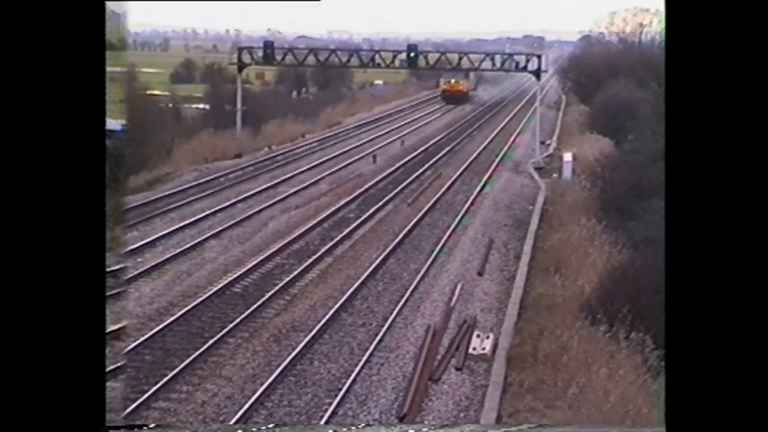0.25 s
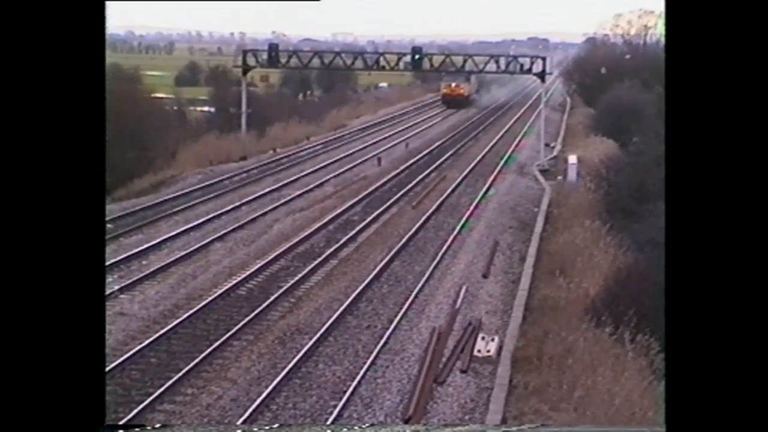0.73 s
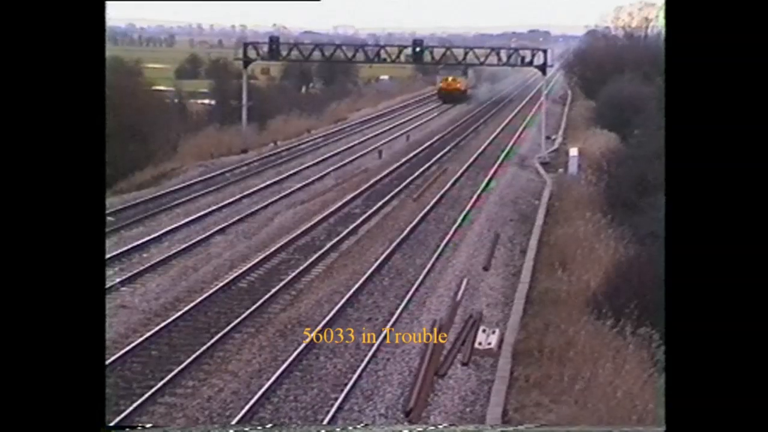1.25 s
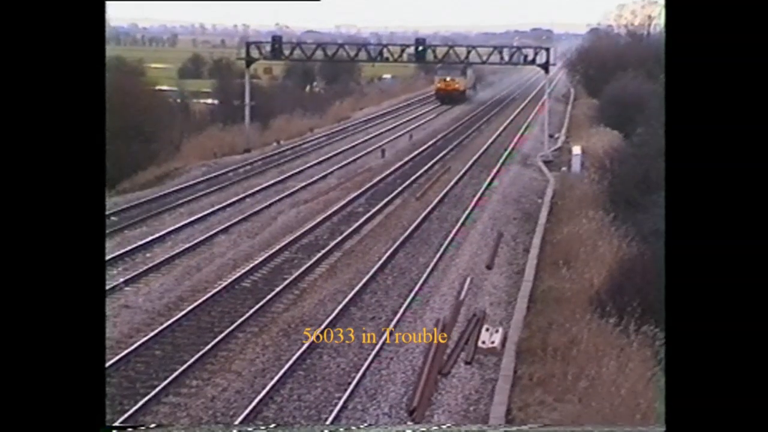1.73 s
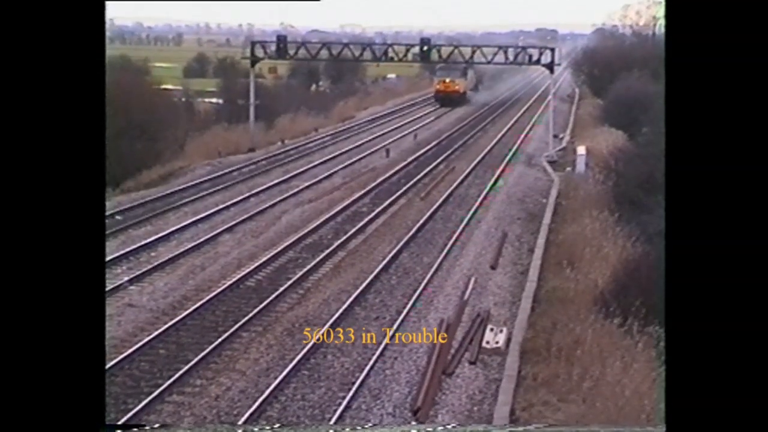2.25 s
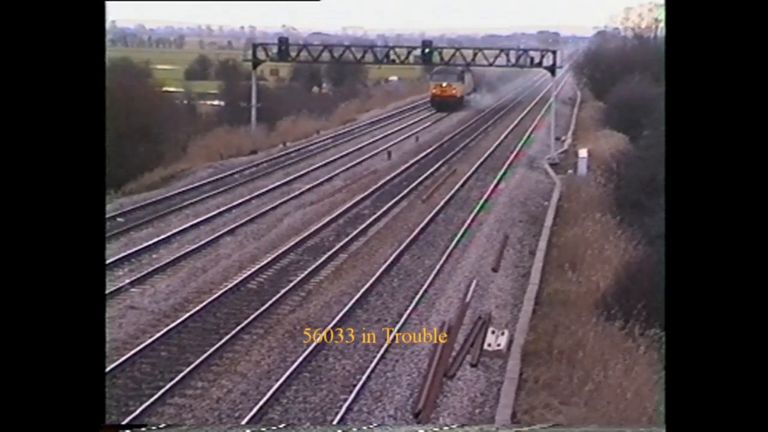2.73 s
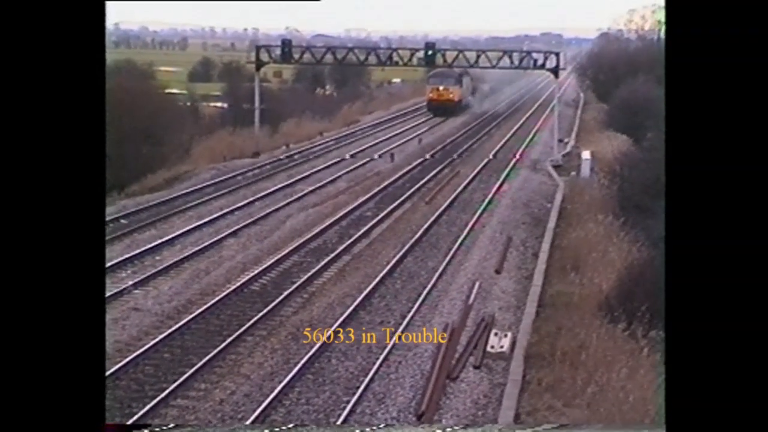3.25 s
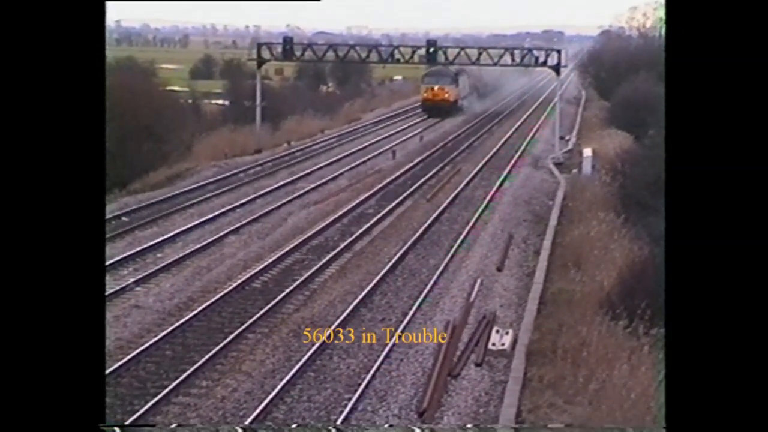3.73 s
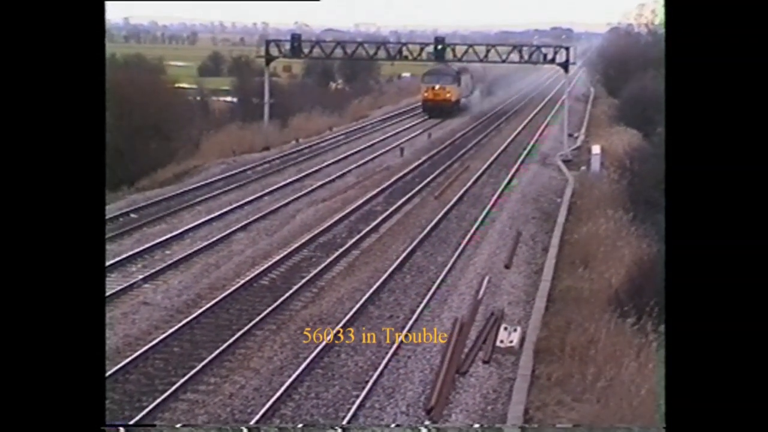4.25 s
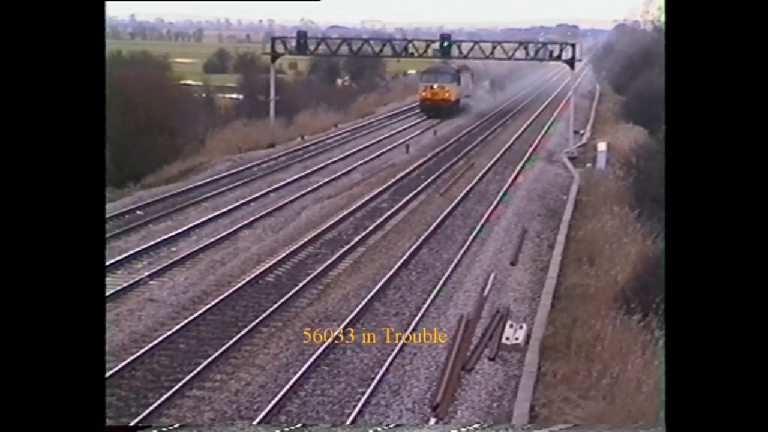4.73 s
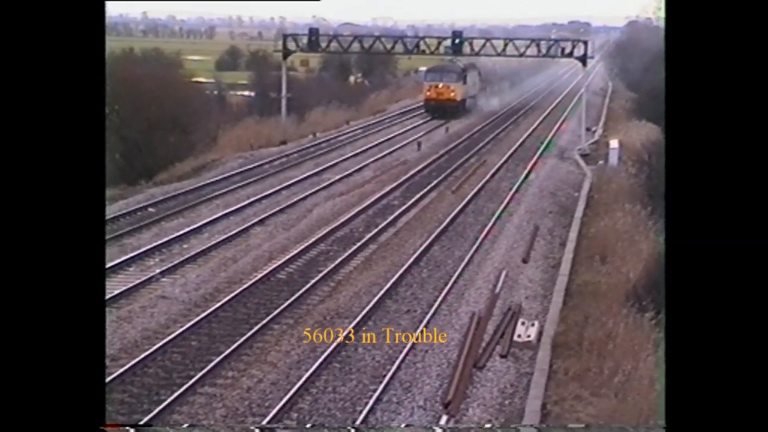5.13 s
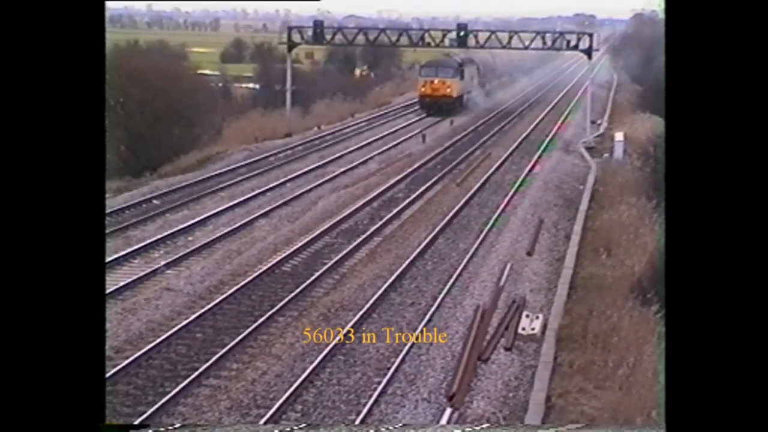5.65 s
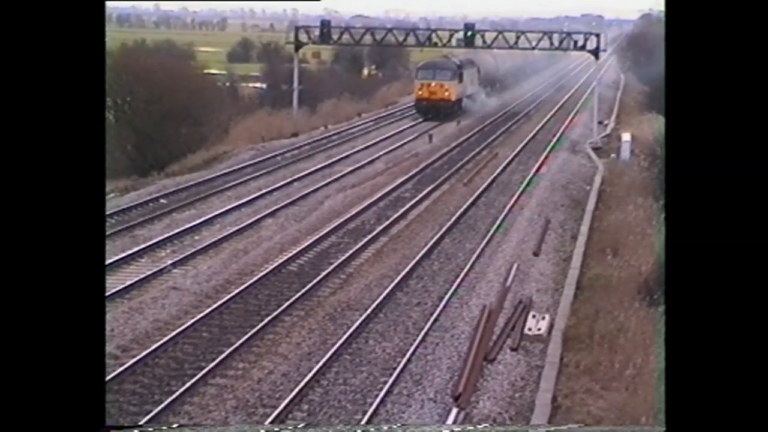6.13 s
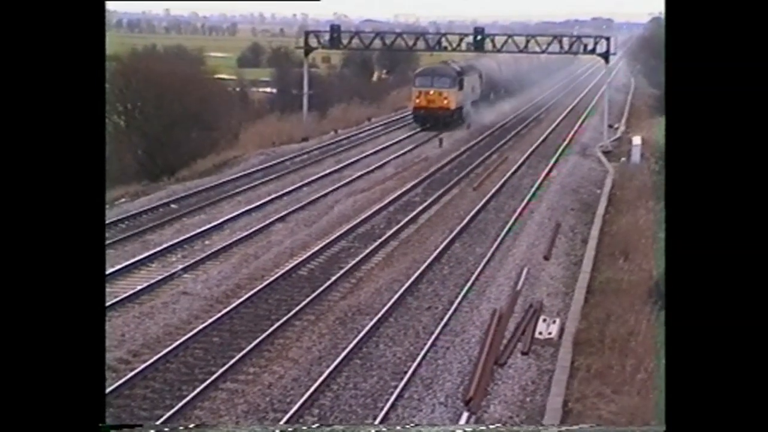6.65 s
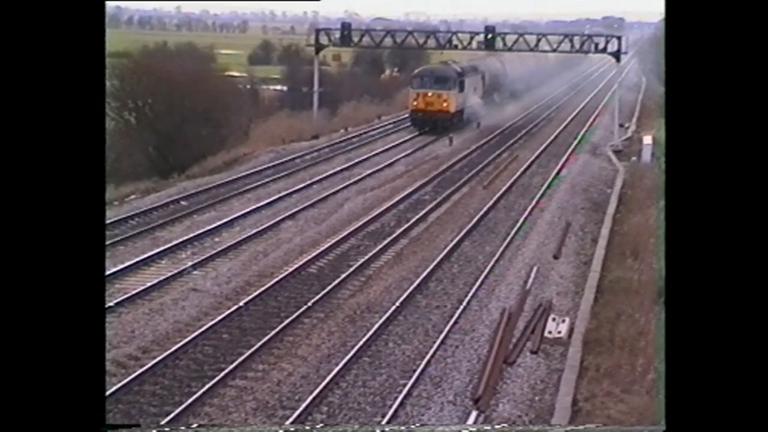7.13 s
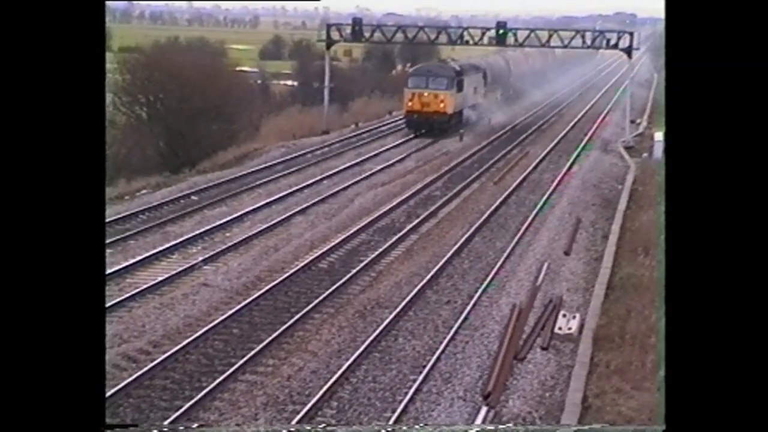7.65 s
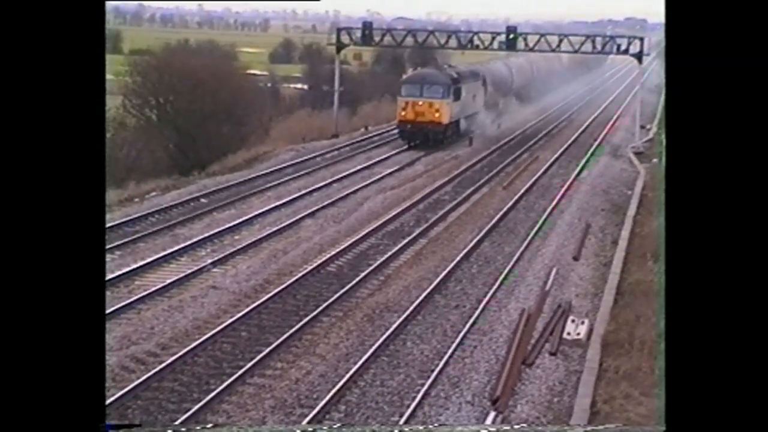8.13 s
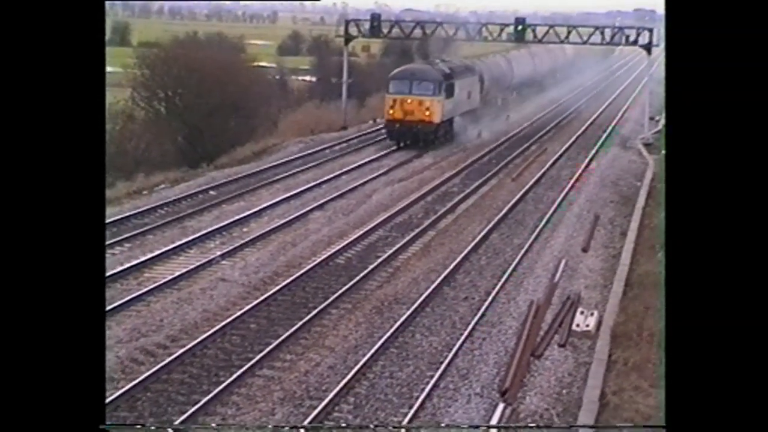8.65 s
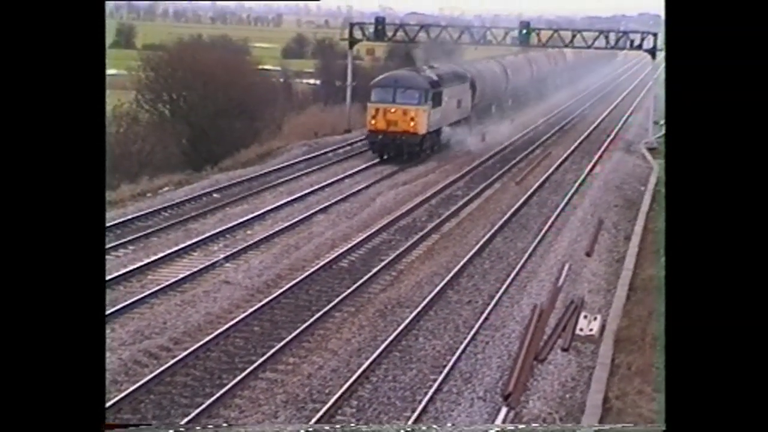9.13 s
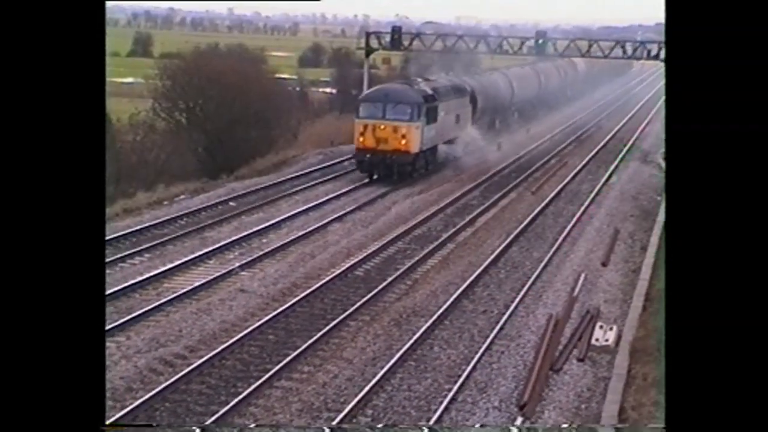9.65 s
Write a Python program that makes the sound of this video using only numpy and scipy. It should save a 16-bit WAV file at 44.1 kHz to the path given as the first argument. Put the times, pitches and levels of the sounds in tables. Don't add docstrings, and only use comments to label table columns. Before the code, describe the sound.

A heavy diesel freight locomotive labours steadily closer, its deep uneven throb swelling under rising fan roar and turbo whine, with brief birdsong and wheel knocks.

```python
import sys
import numpy as np
from scipy import signal
from scipy.fft import rfft, irfft
from scipy.io import wavfile
from scipy.ndimage import uniform_filter1d

SR = 44100
rng = np.random.default_rng(int(sys.argv[2]) if len(sys.argv) > 2 else 0)


def volts(x):
    e = np.asarray(x, float) / 20
    return 10 ** e


def log_audio(samples):
    frames = np.atleast_2d(samples).T
    limited = np.clip(frames, -1, 1)
    pcm = np.round(limited * 32767).astype(np.int16)
    wavfile.write(sys.argv[1], SR, pcm)


N = 436590
T = np.arange(N) / SR

# time_s, speed_cycles_per_s
ENGINE_SPEED = [
    (0, 7.7219),
    (3.468, 7.7263),
    (3.46802, 7.7349),
    (5.2, 7.7348),
    (6.6, 7.738),
    (9.9, 7.749),
]
# place_cycles, thump_db, bark_lag_cycles, bark_db
CYLINDERS = [(0.0337, 8.3, 0.0053, 6.4), (0.0481, 8.7, 0.0054, 4.3), (0.1524, 3.3, 0.0027, 8.7),
             (0.2019, 4.4, -0.0091, 9.6), (0.2502, 4.2, -0.0027, 10.4), (0.3273, 3.1, -0.0044, -2.0),
             (0.4038, 2.7, 0.012, -16.7), (0.4533, 0.3, -0.0088, -7.0), (0.4728, -1.1, -0.0097, -7.2),
             (0.6137, 0.6, 0.0001, -9.6), (0.6278, -5.6, -0.0057, -2.0), (0.7222, -3.5, -0.0075, -15.1),
             (0.7652, -2.2, -0.0069, -10.4), (0.8071, -1.5, -0.0067, -9.9), (0.9167, 9.0, -0.0019, 3.3),
             (0.932, 8.8, -0.0085, 4.6)]
# pitch_hz, width_hz, level_db, polarity
SILENCER_MODES = [(55.2, 16.0, -58.4, 1), (81.5, 18.9, -61.9, 1), (127.5, 16.0, -51.1, -1),
                  (171.0, 36.7, -47.3, -1), (233.5, 16.0, -21.6, 1), (264.6, 16.0, -29.5, -1)]
# pitch_hz, width_hz, level_db, polarity
STACK_MODES = [(369.0, 16.0, -47.8, 1), (446.8, 116.1, -70.5, 1), (624.9, 16.2, -57.3, -1)]
# frequency_hz, density_db_per_hz
GAS_RUMBLE = [(25, -55), (42, -19), (80, 0), (105, -20.5), (150, -3), (215, -11), (270, -3), (320, -16),
              (400, -30.5)]
# frequency_hz, density_db_per_hz
STACK_RUSH = [(310, -33.5), (350, -1), (420, 4), (470, -9.5), (510, -5.5), (600, -2), (690, -7.5),
              (750, -22), (830, -19), (950, -31)]
# frequency_hz, density_db_per_hz
FAN_ROAR = [(500, -24.5), (700, 0), (746, -5.5), (817, 2), (937, -7), (1360, -5.5), (1480, -9.5),
            (1810, -4.5), (2420, -4.5), (2930, -13.5), (3650, -11), (4200, -15), (5200, -20.5), (6200, -36)]
# frequency_hz, density_db_per_hz
FAN_FIZZ = [(3240, -9), (5500, -0.5), (6130, -1.5), (6790, 2), (7570, -3), (9750, -6), (10700, -12.5),
            (12300, -20.5), (14900, -24.5), (15400, -19.5)]
# time_s, gain_db
AIR_PATH = [(0, -1), (1.16, 1.3), (1.57, 0), (2.05, 2.8), (2.45, 0), (3.8, -1), (4.38, -1), (5.05, -2.4),
            (5.52, -0.5), (5.95, -3), (6.34, 1), (6.89, 0.1), (7.6, -1.6), (8.08, 2.5), (8.4, .5),
            (8.66, 0.5), (8.74, -2.5), (9.9, -0.4)]
# start_s, from_hz, to_hz, level_db
WARBLE = [(.659, 5980, 7650, -52.5), (.662, 7600, 8200, -60), (2.93, 3730, 3500, -42),
          (2.941, 3700, 3600, -46), (2.98, 3320, 2900, -46), (3.011, 3430, 4270, -44),
          (3.039, 3290, 4500, -44.5), (3.048, 4820, 2700, -41), (3.111, 3300, 5070, -40.5),
          (3.146, 3690, 5270, -40), (3.165, 3320, 2900, -54), (3.197, 3470, 3900, -45),
          (3.225, 3510, 4250, -41), (3.236, 4190, 2700, -42.5), (3.36, 3150, 2970, -50),
          (3.299, 3520, 4000, -48), (3.388, 3530, 3800, -50.5), (3.422, 3260, 3700, -46),
          (3.456, 3650, 3700, -42.5)]
# start_s, length_s, from_hz, resting_hz, level_db
SWOOPS = [
    (3.918, 0.025, 5660, 7050, -51),
    (4.0, 0.093, 6680, 4900, -56),
    (4.142, .028, 4900, 6400, -50.5),
    (4.168, 0.091, 6160, 4120, -51),
]
# start_s, length_s, from_hz, resting_hz, level_db
SLIDES = [(2.5, .025, 8050, 7900, -72), (2.55, .06, 8150, 7900, -74), (2.62, .05, 7900, 7780, -73),
          (2.675, 0.033, 7700, 7500, -70), (2.685, .04, 8200, 8100, -69), (2.73, .04, 8200, 7800, -72),
          (2.785, .05, 7600, 7830, -75), (3.339, 0.016, 4220, 4170, -45), (3.475, 0.14, 3610, 3620, -54),
          (3.765, 0.091, 7300, 6250, -58), (3.835, 0.032, 6520, 6100, -55.5), (3.94, .07, 7030, 6280, -53),
          (3.969, 0.18, 8120, 6800, -64), (4.05, 0.03, 6700, 6150, -46), (4.205, 0.064, 6550, 5640, -57),
          (4.333, 0.048, 3630, 3290, -44.5), (4.372, 0.045, 3670, 3820, -46.5),
          (4.405, 0.043, 3760, 3680, -48), (4.408, 0.044, 5030, 4900, -51.5),
          (4.51, 0.029, 4160, 4120, -44), (4.547, .04, 4290, 3990, -52.5), (4.58, 0.079, 5390, 5050, -53.5)]
# start_s, peak_db, low_ring_db
WHEEL_KNOCKS = [(0.898, -22, -7.5), (2.035, -23, -7.5), (3.204, -32.5, -1.5), (4.329, -32, 0.5),
                (5.553, -35, 2.5), (5.9394, -36, -10), (6.79, -23.5, -14), (8.2794, -34, -10),
                (8.9374, -29.5, -10), (9.336, -27, -8), (9.479, -26, -2.5), (9.5816, -34, -6),
                (9.64, -31, -6), (9.7294, -36, -4)]
# pitch_hz, level_db, t60_s (the rail's own shorter decay is used)
RAIL_MODES = [(830, 0.5, 0.078), (1075, 4, 0.31), (1594, -7, 0.094), (2060, 5, 0.081), (3650, -9, 0.041),
              (3730, -23.5, 0.23)]
# pitch_hz, level_db, t60_s
AXLE_BOX_MODES = [(805, 0, .15), (1090, 1, .09), (1370, -1, .07)]
# start_s, peak_db
TICKS = [
    (2.152, -47.5),
    (3.294, -48.5),
    (3.3143, -44.5),
    (3.428, -45.5),
    (3.466, -46),
    (8.3619, -40),
    (9.0166, -29),
    (9.3663, -34),
]
# frequency_hz, density_db_per_hz
TAPE_HISS = [(600, 0), (8000, -1), (11500, -2), (13000, -2), (15600, -2.5), (15800, -20)]
# frequency_hz, density_db_per_hz
CIRCUIT_NOISE = [(30, 3), (400, 3), (600, 0), (11800, 0), (12800, -9), (15000, -18)]

CYCLE_HZ = 7.735
START_CYCLES, SKIP_S, SKIP_CYCLES = -.3187, 3.468, .3148
START_M, SPEED_M_PER_S = 261, 17.9
TREBLE_LOSS_DB_PER_M, WHINE_LOSS_DB_PER_M = 0.0639, 0.0348
THUMP_SHARE, BARK_SHARE, BOOM_SHARE = 0.39, 1.09, 0.56
BARK_AIR_SHARE, TREBLE_AIR_SHARE, WHINE_AIR_SHARE = 0.055, 0.89, 0.88
BOOM_NULL_S, BOOM_BEAT_S = 0.85, 5.54
GROUND_DIP_S, GROUND_BEAT_S, THUMP_DIP_DB, BARK_DIP_DB = 4.25, 4.58, 0.15, 1.65
TURBO_HZ, TURBO_RISE_HZ_PER_S = 4407, 51
WARBLE_HZ_PER_S, SWOOP_HZ_PER_S, SLIDE_HZ_PER_S = 120000, 57000, 18000
SHORTEST_S, NOTE_FADE_DB = 0.012, -5


def evened(x):
    return x / np.sqrt(np.mean(x ** 2))


def curves(rows):
    s, *columns = np.transpose(rows)
    return [np.interp(T, s, c) for c in columns]


def add(mix, s, sound):
    part = mix[round(s * SR):][:len(sound)]
    part += sound[:len(part)]


def noise(spectrum, patchy_db):
    hz = np.fft.rfftfreq(2048, 1 / SR)
    f, db = np.transpose(spectrum)
    a, b, patches = rng.standard_normal((N // 512 + 5, 1025, 3)).T
    patches = uniform_filter1d(patches, size=24, axis=0)
    patches = evened(uniform_filter1d(patches, size=6, axis=1))
    colour_db = np.interp(np.log(hz + 1), np.log(f + 1), db, -120, -120)
    z = (a + 1j * b) * volts(colour_db[:, None] + patchy_db * patches)
    return evened(signal.istft(z, nperseg=2048, noverlap=1536)[1][:N])


def resonate(x, hz, width):
    turn = np.exp(2j * np.pi * np.cumsum(hz) / SR)
    r = np.exp(-np.pi * width / SR)
    return 2 * (turn * signal.lfilter([1 - r], [1, -r], x / turn)).real


def crank():
    return START_CYCLES + np.cumsum(curves(ENGINE_SPEED)[0]) / SR + SKIP_CYCLES * (T > SKIP_S)


def approach():
    covered = SPEED_M_PER_S * T
    return covered, 20 * np.log10(START_M / (START_M - covered))


def firings(place, db, modes, uneven):
    cycles, steps = 80, 4096
    at = np.arange(cycles)[:, None] + place
    train = np.zeros(cycles * steps)
    slots = np.round(at * steps).astype(int) % len(train)
    np.add.at(train, slots, volts(db) * (1 + uneven * rng.standard_normal(at.shape)))
    hz = np.arange(len(train) // 2 + 1) * CYCLE_HZ / cycles
    pipe = sum(sign * volts(g) / (1 + 2j * (hz - f) / width) ** 2 for f, width, g, sign in modes)
    rung = np.roll(irfft(rfft(train) * pipe), steps)
    return evened(np.interp((crank() + 1) * steps, np.arange(len(train)), rung))


def exhaust():
    place, thump, lag, bark = np.transpose(CYLINDERS)
    near_db = approach()[1]
    air_db = curves(AIR_PATH)[0]
    interference = abs(np.sin(np.pi * (T - BOOM_NULL_S) / BOOM_BEAT_S))
    boom = np.cos(2 * np.pi * (11 * crank() + 0.32)) * interference
    wander = uniform_filter1d(rng.standard_normal(N), size=9000)
    wander = evened(uniform_filter1d(wander, size=9000))
    boom = boom * volts(1.4 * wander)
    dip = np.cos(2 * np.pi * (T - GROUND_DIP_S) / GROUND_BEAT_S)
    thumps = firings(place, thump, SILENCER_MODES, uneven=.025)
    barks = firings(place + lag, bark, STACK_MODES, uneven=.1)
    rush = volts(2.5) * noise(STACK_RUSH, patchy_db=0.5)
    gas = volts(-13.5) * noise(GAS_RUMBLE, patchy_db=1.5)
    thump_db = -23.0 + THUMP_SHARE * near_db - THUMP_DIP_DB * dip
    boom_db = -35.5 + BOOM_SHARE * near_db
    bark_db = -47.0 + BARK_SHARE * near_db + BARK_AIR_SHARE * air_db - BARK_DIP_DB * dip
    splice = 1 - 0.53 * np.exp(-((T - SKIP_S) / .0008) ** 2)
    return splice * (volts(thump_db) * (thumps + gas) + volts(boom_db) * boom + volts(bark_db) * (barks + rush))


def machinery():
    covered, near_db = approach()
    air_db = curves(AIR_PATH)[0]
    roar_db = -51.0 + near_db + air_db
    treble_db = -80.0 + near_db + TREBLE_LOSS_DB_PER_M * covered + TREBLE_AIR_SHARE * air_db
    whine_db = -66.5 + near_db + WHINE_LOSS_DB_PER_M * covered + WHINE_AIR_SHARE * air_db
    gusts, flutter = (evened(uniform_filter1d(v, size=1500)) for v in rng.standard_normal((2, N)))
    waver = evened(uniform_filter1d(flutter, size=3000))
    hz = TURBO_HZ + TURBO_RISE_HZ_PER_S * T
    hz = hz * (1 + .0009 * T * waver)
    breath = rng.standard_normal((2, N))
    whine = evened(resonate(resonate(breath[0], hz, 240), hz, 240))
    octave = evened(resonate(resonate(breath[1], 2 * hz, 340), 2 * hz, 340))
    roar = volts(roar_db + 4.5) * noise(FAN_ROAR, patchy_db=0.78)
    fizz = volts(treble_db + 7.0) * noise(FAN_FIZZ, patchy_db=1.5)
    tones = volts(whine_db + 2 + 0.6 * flutter) * whine + volts(treble_db - 2.4) * octave
    return volts(0.24 * gusts) * (roar + fizz) + tones


def birds():
    out = np.zeros(N)
    tremble = evened(uniform_filter1d(rng.standard_normal(N), size=250))
    strokes = [(s, max(abs(b - a) / WARBLE_HZ_PER_S, SHORTEST_S), a, b, db) for s, a, b, db in WARBLE]
    for notes, speed in (strokes, WARBLE_HZ_PER_S), (SWOOPS, SWOOP_HZ_PER_S), (SLIDES, SLIDE_HZ_PER_S):
        for s, length, a, b, db in notes:
            u = np.linspace(0, 1, round(length * SR))
            shake = tremble[round(s * SR):][:len(u)]
            glide = np.sign(b - a) * np.minimum(speed * length * u, abs(b - a))
            hz = a + uniform_filter1d(glide, size=len(u) // 5, mode="nearest")
            turns = 2 * np.pi * np.cumsum(hz * (1 + 0.0091 * shake)) / SR
            second = volts(-23) * np.sin(2 * turns) * (s > 3.7) * np.clip((a - 3900) / 1500, 0, 1)
            third = volts(-27) * np.sin(3 * turns) * (s > 4.5) * (a < 4400)
            tone = np.sin(turns) + second + third
            shape = signal.windows.tukey(len(u), np.clip(0.018 / length, .2, .7))
            add(out, s, volts(db + 5 + NOTE_FADE_DB * u + 3.0 * shake) * tone * shape)
    t = np.arange(6000) / SR
    bushes = rng.standard_normal(6000) * volts(-60 * t / 0.22) * (t > .003)
    return out + volts(-6.5) * signal.oaconvolve(out, bushes / np.linalg.norm(bushes))[:N]


def wheels():
    out = np.zeros(N)
    t = np.arange(4000) / SR
    rail_t60 = .008
    rail = sum(volts(db - 60 * t / rail_t60) * np.sin(2 * np.pi * hz * t) for hz, db, _ in RAIL_MODES)
    rail = rail * np.minimum(t / 0.00046, 1) ** 2
    ring = sum(volts(db - 60 * t / t60) * np.sin(2 * np.pi * hz * t) for hz, db, t60 in AXLE_BOX_MODES)
    ring = ring * np.minimum(t / 0.0067, 1)
    for s, db, ring_db in WHEEL_KNOCKS:
        contact = rng.standard_normal(4000) * volts(-60 * t / 0.12) * np.minimum(t / 0.0018, 1)
        rattle = np.convolve(contact, rail)[:4000]
        add(out, s, volts(db - 3.0) * (rattle / abs(rattle).max() + volts(ring_db) * ring))
    return out


def ticks():
    out = np.zeros(N)
    for s, db in TICKS:
        click = np.convolve([0.67, 0.89, -.6, -.8, -0.24], [.3, .6, .3] if s > 8 else [1])
        add(out, s, volts(db + 7.5) * click)
    return out


def scene():
    return np.array([exhaust() + machinery() + birds() + wheels(), np.zeros(N)])


def top_cut(x):
    return signal.sosfilt(signal.butter(12, 15740, fs=SR, output="sos"), x)


def record(dry):
    peak_db = 10 * np.log10(uniform_filter1d(dry[0] ** 2, size=200) + 1e-12)
    fall = T * 55
    held_db = np.maximum.accumulate(peak_db + fall) - fall
    over_db = np.maximum(held_db + 20, 0)
    surge_db = over_db - uniform_filter1d(over_db, size=SR // 2)
    duck_db = .65 * uniform_filter1d(surge_db, size=100, origin=49)
    scan = np.sin(2 * np.pi * 15625 * T)
    heard = 0.54 * np.tanh(dry[0] / volts(duck_db) / 0.53)
    left = heard + ticks() + volts(-74.5) * noise(TAPE_HISS, patchy_db=-0.5) + volts(-77.5) * scan
    circuit = volts(-94) * noise(CIRCUIT_NOISE, patchy_db=0)
    right = circuit + volts(-91) * scan + volts(-96) * np.sin(2 * np.pi * 8000 * T)
    return top_cut(np.array([left, right]))


dry = scene()
out = record(dry)
log_audio(out)
```